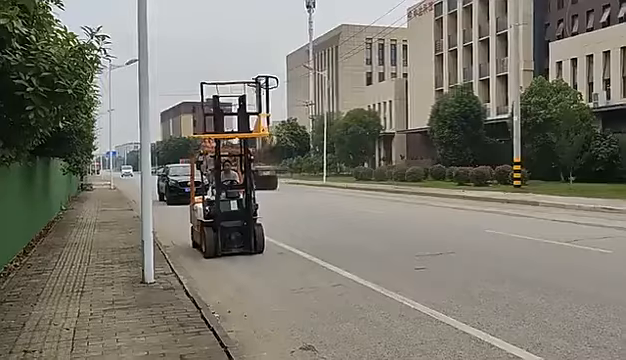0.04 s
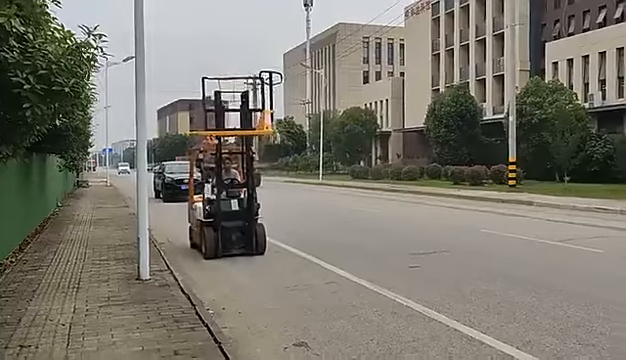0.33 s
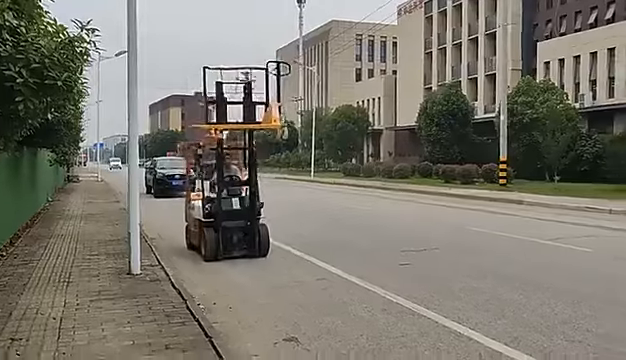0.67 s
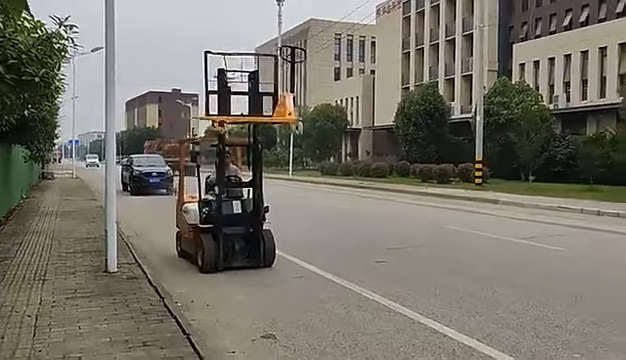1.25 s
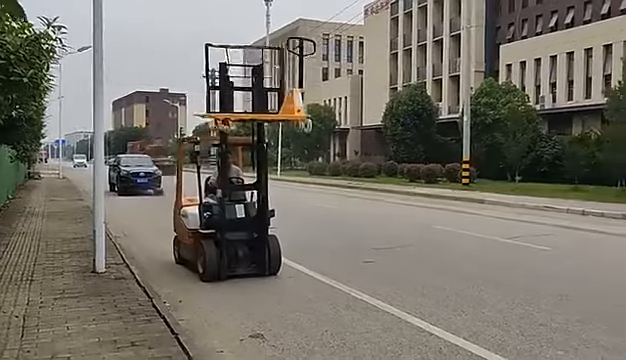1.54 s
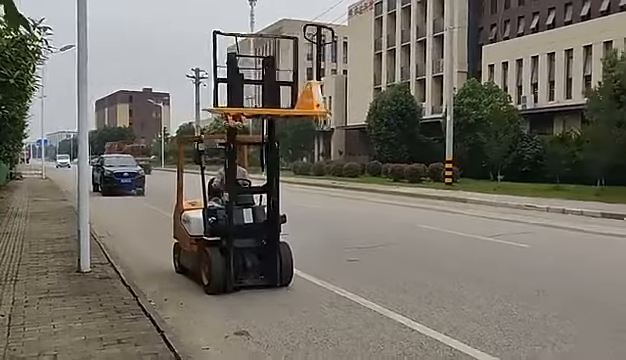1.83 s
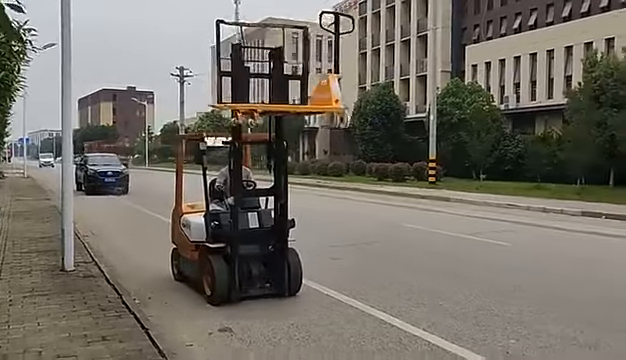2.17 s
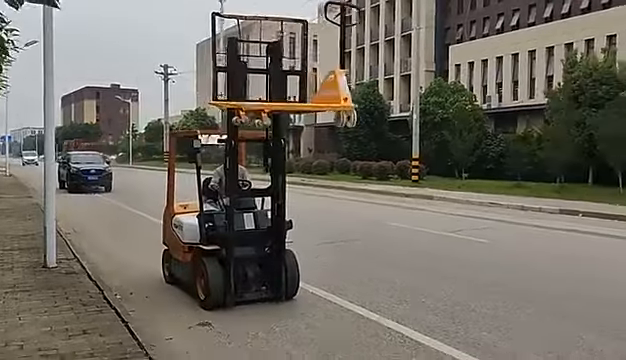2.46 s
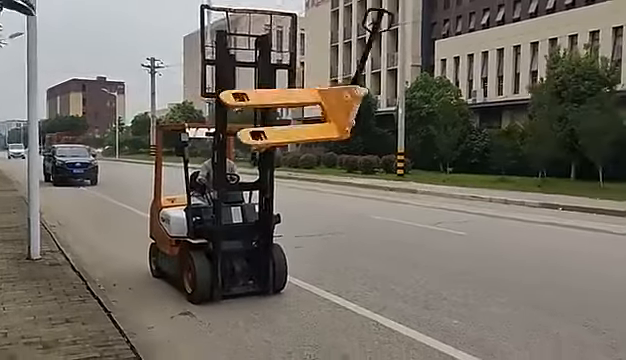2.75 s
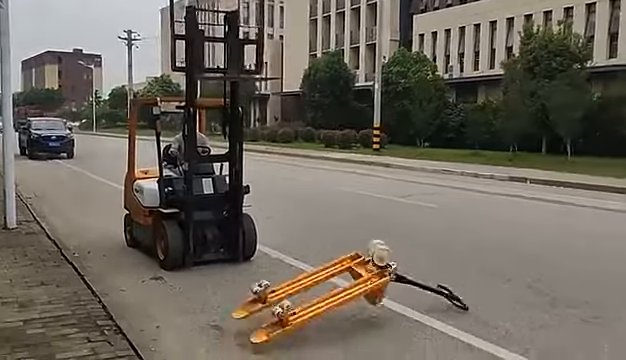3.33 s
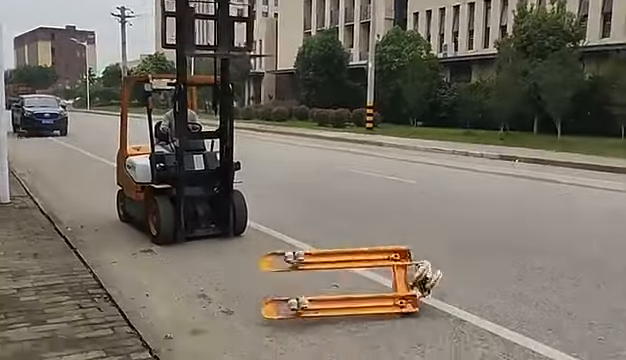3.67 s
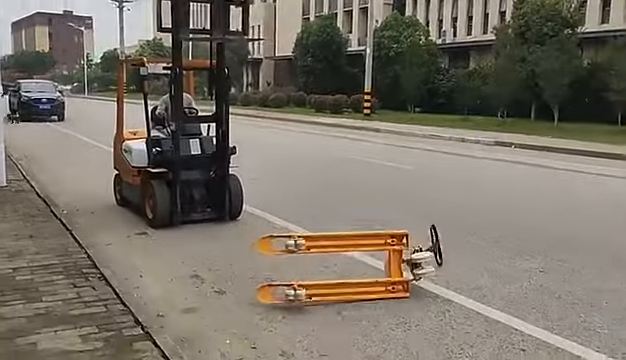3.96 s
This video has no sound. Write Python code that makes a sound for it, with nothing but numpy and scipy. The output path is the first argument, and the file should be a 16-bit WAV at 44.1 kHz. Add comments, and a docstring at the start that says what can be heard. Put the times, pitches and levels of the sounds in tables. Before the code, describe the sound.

A diesel forklift revs with a rising whine, then drops to idle. A steel pallet jack knocks, falls from it and crashes onto asphalt, tumbling, ringing and rattling. Heard from a few metres away on a street through a phone microphone.

```python
"""A diesel forklift revs at the roadside, its transmission whining as it gathers speed, then drops to idle.
A steel pallet jack on its raised forks knocks, slides off, crashes on the asphalt and tumbles,
its frame ringing and its loose parts rattling. Building fronts echo the crash faintly over the street.
Heard from a few metres away on a phone's stereo microphone, with a limiter on the loudest blows."""
import sys
import numpy as np
from scipy import signal
from scipy.fft import rfft, irfft
from scipy.io import wavfile
from scipy.ndimage import uniform_filter1d, minimum_filter1d

SR = 44100
rng = np.random.default_rng(int(sys.argv[2]) if len(sys.argv) > 2 else 0)


def put_to_file(sound):
    """Save the sound as 16-bit audio at rate SR, in the file named by the first command-line argument."""
    columns = np.atleast_2d(sound).T  # one column per channel
    safe = np.clip(columns, -1, 1)
    whole_steps = np.round(safe * 32767)
    wavfile.write(sys.argv[1], SR, whole_steps.astype(np.int16))


N = 176400
T = np.arange(N) / SR
HZ = np.fft.rfftfreq(N, 1 / SR)
TOP_HZ = 7600  # upper edge of the phone's treble

# blows on the jack: start_s, clang_db, rattle_db, boom_db, contact_s
JACK_BLOWS = [(1.812, -41, -30.5, -28, 0.013), (2.165, -23, -54.5, -18.5, 0.012),
              (2.192, -24.5, -52, -17.5, 0.02), (2.767, -23, -34.5, -29.5, 0.042),
              (3.191, -11, -17.5, -24, 0.0016), (3.207, -17, -20.5, -43, 0.015),
              (3.383, -8, -15.5, -23, .016), (3.433, -16, -20, -25, .016), (3.466, -20, -24, -11, .006),
              (3.483, -7, -12.5, -30, .018), (3.532, -28, -23, -30, 0.0086),
              (3.571, -28, -21, -21.5, 0.011), (3.643, -25, -22, -13.5, 0.0034),
              (3.661, -22.5, -25.5, -8.5, .025), (3.712, -24.5, -33, -20.5, 0.021),
              (3.779, -18, -28, -26, .004), (3.816, -17, -16.5, -22, .005), (3.838, -25, -26, -18, .003),
              (3.852, -10.5, -16, -22, .004), (3.881, -12.5, -17.5, -19, .02),
              (3.935, -20.5, -40, -33, 0.0038), (3.978, -31, -31, -28, 0.027)]


def forklift():
    """Four diesel cylinders fire in turn.
    The exhaust hums on the left; pipe, clatter and intake sound louder on the right."""
    engine_speed = [(0, 50.5), (.25, 54), (.5, 56.5), (.8, 58.4), (1.25, 62.1), (1.5, 64.2), (1.75, 66.2),
                    (1.91, 68), (2, 65), (2.1, 59), (2.22, 51), (2.4, 42), (2.6, 35.3), (3, 26), (4, 31.7)]  # time_s, firings_per_s
    engine_effort = [(0, -3), (.45, 0), (1.05, 0), (1.5, 2), (1.78, 2.6), (1.94, 2.3), (2.08, -.7),
                     (2.4, -1.5), (2.7, -2.3), (3, -5), (3.3, -8), (4, -3.5)]  # time_s, level_db
    cylinders = [1, -1.2, .2, -1]  # strength of each cylinder: level_db
    firing_hz, effort_db = curve(engine_speed), curve(engine_effort)
    cycles = np.cumsum(firing_hz) / SR
    firing, phase = cycles.astype(int), cycles % 1
    strength = undb(np.array(cylinders)[firing % 4] + 1.2 * rng.standard_normal(N)[firing])
    pulses = unit(np.diff(firing, prepend=0) * strength)
    throb = unit(np.sqrt(strength) * (0.98 + np.exp(-phase)))  # peaks at each firing
    drive = pulses + 0.4 * throb * stereo_noise(1)
    idle_fade = np.minimum(firing_hz / 50, 1) ** 2  # the low tones weaken at low revs
    hum = exhaust_hum(cycles, strength, effort_db) * idle_fade
    pipe = exhaust_pipe(drive, cycles, effort_db, idle_fade)
    block = clatter(throb, effort_db) + load_whine(drive, effort_db)
    hiss = engine_hiss(throb)
    singing = intake(drive, effort_db) + engine_orders(cycles, firing_hz, effort_db) + transmission()
    return (pan(hum, 41) + pan(pipe, -4) + pan(block, -8, lag_s=0.00014)
            + pan(hiss, -1) + pan(singing, -5.5, lag_s=0.00005))


def exhaust_hum(cycles, strength, effort_db):
    """The exhaust hums at the firing rate and, louder, an octave up, over a low rumble."""
    rumble_spectrum = [(25, -27.5), (45, -10), (65, -6), (95, -2.5), (160, -3.5), (300, -39.5)]  # freq_hz, gain_db
    tones = undb(-59.5) * np.sin(2 * np.pi * cycles) + undb(-36.5) * np.sin(2 * np.pi * 2 * cycles)
    hum = np.sqrt(2) * tones * uniform_filter1d(strength, size=900)
    rumble = undb(-39.5) * colour(rng.standard_normal(N), rumble_spectrum)
    return (hum + rumble) * undb(0.96 * effort_db)


def exhaust_pipe(drive, cycles, effort_db, idle_fade):
    """The firings ring the pipe and body, over a drone at three times the firing rate."""
    pipe_resonances = [(130, 47, -23), (206.6, 26.7, -0.5), (263.7, 66, -3.5), (332.6, 15, -5),
                       (357, 24, -5), (515.6, 17, -2)]  # pitch_hz, width_hz, level_db
    ringing = unit(colour(resonate(drive, pipe_resonances), [(50, -20), (170, 0)]))
    drone = undb(-40 + effort_db) * idle_fade * rough_tone(3 * cycles)
    return undb(-34 + 1.5 * effort_db) * ringing + drone


def clatter(throb, effort_db):
    """Combustion clatter: broad noise that surges with each firing."""
    clatter_spectrum = [(100, -22), (250, 6.5), (450, -3), (700, 5.5), (930, -3), (1150, 2), (1600, 3),
                        (2100, 3.5), (2500, -7.5), (3100, -13), (3900, -33.5), (5200, -23), (7500, -33.5)]  # freq_hz, gain_db
    return undb(-23 + effort_db) * colour(throb * stereo_noise(0.63), clatter_spectrum)


def load_whine(drive, effort_db):
    """The firings excite one narrow band, which whines under load."""
    band = [(1440, 190, 0)]  # pitch_hz, width_hz, level_db
    return undb(-40 + 3.4 * effort_db) * unit(resonate(resonate(drive, band), band))


def engine_hiss(throb):
    """A high hiss pulses gently with the firings."""
    hiss_level = [(0, -45), (.8, -43), (1.8, -41), (2.3, -38), (2.75, -39), (3.05, -47.5), (4, -48)]  # time_s, level_db
    hiss_spectrum = [(3000, -31.5), (4200, -13), (5200, -3.5), (6300, 6), (7400, 10), (8000, -16)]  # freq_hz, gain_db
    return undb(curve(hiss_level)) * colour(np.sqrt(throb) * stereo_noise(0.96), hiss_spectrum)


def intake(drive, effort_db):
    """The firings ring the intake, which sings under load."""
    intake_resonances = [(633.5, 34, 7.5), (719, 43, 4), (2017, 67, -3.5)]  # pitch_hz, width_hz, level_db
    ringing = unit(colour(resonate(drive, intake_resonances), [(2200, -3.5), (3500, -53.5)]))
    return undb(-33.5 + 2 * effort_db) * ringing


def engine_orders(cycles, firing_hz, effort_db):
    """Engine orders swell as they glide through the intake resonances; the 22nd whines under load."""
    orders = [(9, -7), (10, -2), (11, 0), (12, -3)]  # engine harmonics: firing_multiple, level_db
    intake_peaks = [(622, 18, .5), (718, 24, -2)]  # pitch_hz, half_width_hz, level_db
    tones = 0
    for order, db in orders:
        swell = sum(undb(peak_db) / np.hypot(1, ((order * firing_hz - hz) / width) ** 2)
                    for hz, width, peak_db in intake_peaks)
        tones += undb(db) * swell * rough_tone(order * cycles)
    whine = undb(-39 + 3.4 * effort_db) * rough_tone(22 * cycles)
    return undb(-29.5 + 1.4 * effort_db) * tones + whine


def transmission():
    """The gear whine climbs as the forklift gathers speed, then sags and fades."""
    gear_whine = [(1.3, 580, -55), (1.43, 596, -28), (1.55, 612, -29), (1.62, 623, -21), (1.7, 635, -28),
                  (1.85, 660, -29), (1.92, 676, -23), (2.05, 666, -31), (2.2, 640, -55)]  # time_s, pitch_hz, level_db
    times, hz, db = np.array(gear_whine).T
    level = undb(np.interp(T, times, db)) * (T > times[0]) * (T < times[-1])
    return level * rough_tone(np.cumsum(np.interp(T, times, hz)) / SR)


def pallet_jack():
    """Each chattering blow rings the frame and its own set of small parts; once down, the jack scrapes."""
    scrape_level = [(3.33, -44), (3.38, -24), (3.52, -40), (3.6, -23.5), (3.74, -28), (3.84, -18),
                    (3.92, -37), (4, -19)]  # steel on asphalt: time_s, level_db
    clang_spectrum = [(40, -27), (150, -7), (360, 1), (500, 0.5), (680, 6.5), (830, 5.5), (1080, 2.5),
                      (1400, 7.5), (1650, 5.5), (2050, 9), (2600, 0), (3400, -14), (4200, -17.5),
                      (7500, -17)]  # body of a blow: freq_hz, gain_db
    rattle_spectrum = [(1500, -17), (3200, 4), (4200, -10), (5000, -9), (5900, 4), (6700, 4), (7500, 6),
                       (8000, -22)]  # loose parts: freq_hz, gain_db
    frame_modes = [(663, -2, 1.3), (798, -1, 1.3), (932, -5, 1.3), (1027, -5, 1.3), (1165, -5, 1),
                   (1252, -3, 1.2), (1344, -4, .9), (1682, -3, .8), (1788, -3, .6), (2000, 0, .6),
                   (2397, -1, .9), (2870, -10, .35), (3451, -10, .3), (4797, -8, .22), (5512, -11, .3),
                   (6700, -8, .35), (7444, -3, .45)]  # steel frame: pitch_hz, level_db, t60_s
    scrape = undb(curve(scrape_level)) * (T > scrape_level[0][0]) * grit(90, spread_db=3.5)
    chatter = grit(600, spread_db=1)
    push = chatter * stereo_noise(0.63)
    clang = colour(push, clang_spectrum)
    rattle = colour(chatter * stereo_noise(0.73), rattle_spectrum)
    crash = scrape * (clang + undb(-19.5) * rattle)
    force = scrape * push
    parts = ring(crash, small_parts())
    for start, clang_db, rattle_db, _, contact_s in JACK_BLOWS:
        near = slice(int((start - .1) * SR), int((start + .4) * SR))
        age = T[near] - start
        clang_level = undb(clang_db) * contact(age, contact_s, swell_in_db=-12)
        rattle_level = undb(rattle_db) * contact(age, contact_s, swell_in_db=-6.5)
        blow = clang_level * clang[:, near] + rattle_level * rattle[:, near]
        force[:, near] += clang_level * push[:, near]
        crash[:, near] += blow
        parts[:, near] += ring(blow, small_parts())[:, :len(age)]
    frame = ring(force, steel(frame_modes))
    metal = undb(-4) * crash + undb(-3) * parts + undb(-8) * frame
    return pan(metal + fork_boom() + clinks() + jingle() + road_thumps(), -1.5)


def contact(age, length_s, swell_in_db, rise_s=0.011, release_s=0.008):
    """A short swell into the blow, a hold while the parts chatter, and a quick release."""
    swell_in = undb(swell_in_db) * np.exp(-abs(age) / rise_s)
    hold = np.exp(-np.maximum(age - length_s, 0) / release_s)
    return np.where(age < 0, swell_in, hold)


def steel(modes):
    """Response of decaying modes (pitch_hz, level_db, t60_s), each with its own phase in each channel."""
    t = T[:int(SR * min(max(t60 for _, _, t60 in modes), 1))]
    phases = rng.uniform(0, 2 * np.pi, (len(modes), 1)) + 1.235 * rng.standard_normal((len(modes), 2))
    return sum(undb(db - 60 * t / t60) / np.sqrt(t60) * np.sin(2 * np.pi * hz * t + phase[:, None])
               for (hz, db, t60), phase in zip(modes, phases))


def small_parts(count=40, lowest_hz=420, t60_s=0.05):
    """Response of rods, wheels and plates: short modes of uneven strength, denser at the low end."""
    position = (np.arange(count) + rng.random(count)) / count
    pitches = lowest_hz + position ** 1.3 * (TOP_HZ - lowest_hz)
    levels = 3 * rng.uniform(-0.41, 1, count)
    return steel([(hz, db, t60_s) for hz, db in zip(pitches, levels)])


def fork_boom(pitch_hz=268, rise_s=0.0033, release_s=0.0082):
    """The hollow forks boom at one low pitch when they land flat."""
    swell = np.zeros(N)
    for start, _, _, db, contact_s in JACK_BLOWS:
        attack = np.clip((T - start) / rise_s, 0, 1)
        swell += undb(db) * attack * np.exp(-np.maximum(T - start - contact_s, 0) / release_s)
    return undb(1.5) * swell * np.sin(2 * np.pi * pitch_hz * T)


def clinks(spread=0.0523, count=5):
    """Latches, handle and wheels strike hard, each a tight cluster of quickly fading modes."""
    strikes = [(2.167, 1900, -9.5, .05), (2.19, 585, -17, .09), (3.194, 685, -7, .07),
               (3.383, 3200, -7, .03), (3.394, 805, -3, .06), (3.487, 1500, -7, .06),
               (3.498, 2020, -5, .05), (3.645, 2030, -15, .06), (3.779, 1800, -10, .046),
               (3.804, 1950, -13, .05), (3.818, 2030, -12, .06), (3.852, 760, 1, .075),
               (3.866, 930, -8, .08), (3.881, 1120, -7, .07), (3.897, 720, -3, .08),
               (3.932, 2120, -14, .05)]  # start_s, pitch_hz, level_db, t60_s
    out = np.zeros(N)
    for start, hz, db, t60 in strikes:
        age = np.maximum(T - start, 0)
        offsets = np.linspace(-1, 1, count) + rng.uniform(-0.38, 0.081, count)
        cluster = sum(np.sin(2 * np.pi * (hz * (1 + spread * k) * age + rng.random())) for k in offsets)
        out += (T > start) * undb(db - 60 * age / t60) * cluster / np.sqrt(count)
    return out


def jingle(from_s=3.4, strikes_per_s=44, t60_s=0.16):
    """Pins, rods and rollers rattle as the jack tumbles, each strike with its own modes."""
    mode_bands = [(800, 1500), (1500, 2450), (2700, 3600), (4800, 6500), (6200, 7550), (6600, 7550)]  # one mode falls in each: low_hz, high_hz
    out = np.zeros((2, N))
    for k in range(int((T[-1] - from_s) * strikes_per_s)):
        start = int((from_s + (k + rng.random()) / strikes_per_s) * SR)
        ping = steel([(rng.uniform(low, high), 0, t60_s) for low, high in mode_bands])[:, :N - start]
        gain = undb(-26.5 + 3.5 * rng.uniform(-1, 1)) * np.sqrt(t60_s)
        out[:, start:start + ping.shape[1]] += gain * ping
    return out


def road_thumps(decay_s=0.025):
    """The jack's weight lands on the asphalt with dull thumps."""
    landings = [(3.432, -22), (3.475, -23.5), (3.88, -34)]  # start_s, level_db
    thump_spectrum = [(25, -16), (80, 5.5), (170, 6), (450, 8), (900, -32)]  # freq_hz, gain_db
    swell = sum(undb(db) * (T > start) * np.exp(-abs(T - start) / decay_s) for start, db in landings)
    return swell * colour(stereo_noise(0.68), thump_spectrum)


def building_echo(x, delay_s=0.02, t60_s=0.3):
    """The building fronts return a late, diffuse echo."""
    t = T[:SR]
    tail = rng.standard_normal((2, SR)) * undb(-60 * t / t60_s) * (t > delay_s)
    return undb(-12.5) * ring(x, tail)


def street():
    """The steady, low wash of the street."""
    street_spectrum = [(25, -38), (70, -23.5), (150, 0.5), (235, -1.5), (280, 14.5), (330, 1), (450, 0.5),
                       (670, 4.5), (900, 0), (2000, -7), (3000, -16), (4000, -36.5), (7000, -54)]  # freq_hz, gain_db
    return pan(undb(-29) * colour(stereo_noise(0.72), street_spectrum), 0.36)


def undb(db):
    """Decibels to gain."""
    return 10 ** (np.asarray(db) / 20)


def unit(x):
    """Scale to rms 1."""
    return x / np.sqrt(np.mean(x ** 2))


def curve(rows):
    """Join (time_s, value) rows by straight lines."""
    return np.interp(T, *np.array(rows).T)


def colour(x, rows):
    """Filter by (freq_hz, gain_db) points, keeping the power of white noise."""
    hz, db = np.array(rows).T
    gain = undb(np.interp(np.log(HZ + 1), np.log(hz), db)) * (HZ < TOP_HZ * 1.1)
    return irfft(rfft(x) * unit(gain), N)


def resonate(x, rows):
    """Parallel resonances (pitch_hz, width_hz, level_db) of alternating polarity."""
    return sum((-1) ** k * undb(db) * signal.lfilter(*signal.iirpeak(hz, hz / width, SR), x)
               for k, (hz, width, db) in enumerate(rows))


def ring(x, response):
    """Pass through an impulse response scaled to unit energy."""
    response = response / np.sqrt(np.mean(np.sum(response ** 2, axis=-1)))
    return signal.fftconvolve(x, response, axes=-1)[:, :N]


def stereo_noise(correlation):
    """Left and right noise, partly shared."""
    shared = np.sqrt(correlation) * rng.standard_normal(N)
    return shared + np.sqrt(1 - correlation) * rng.standard_normal((2, N))


def grit(rate, spread_db):
    """Uneven contact: random strengths, each held 1 / rate s."""
    return unit(undb(spread_db * np.clip(rng.standard_normal(N), -2, 2))[(T * rate).astype(int)])


def rough_tone(cycles, wavers_per_s=60):
    """A tone that wavers quickly in strength and phase."""
    jitter = 0.06 * uniform_filter1d(rng.standard_normal(N)[(T * wavers_per_s).astype(int)], size=300)
    strength = uniform_filter1d(grit(wavers_per_s, spread_db=5.5), size=300)
    return strength * np.sin(2 * np.pi * (cycles + jitter + rng.random()))


def pan(x, left_db, lag_s=0):
    """Set the left channel left_db above the right, and delay the right by lag_s."""
    left, right = np.broadcast_to(x, (2, N))
    gain = unit(undb([left_db / 2, -left_db / 2]))
    return np.array([gain[0] * left, gain[1] * np.interp(T - lag_s, T, right)])


def scene():
    """The forklift, the falling jack and its echo, over the street."""
    jack = pallet_jack()
    return forklift() + jack + building_echo(jack) + street()


def record(dry, start_s=0.069, ceiling_db=-0.3):
    """The phone opens after a moment's silence, limits the loudest blows and cuts the treble."""
    x = dry * (T > start_s)
    gain = np.minimum(1, undb(ceiling_db) / (abs(x).max(axis=0) + 1e-9))
    limited = x * uniform_filter1d(minimum_filter1d(gain, size=60), size=60)
    return signal.sosfilt(signal.ellip(10, .2, 70, TOP_HZ, fs=SR, output="sos"), limited)


dry = scene()
out = record(dry)
put_to_file(out)
```